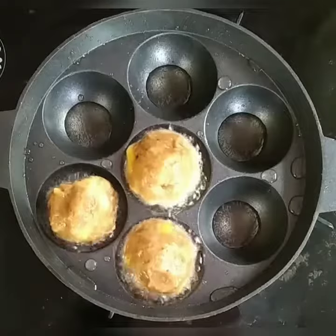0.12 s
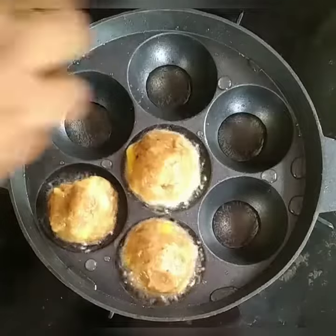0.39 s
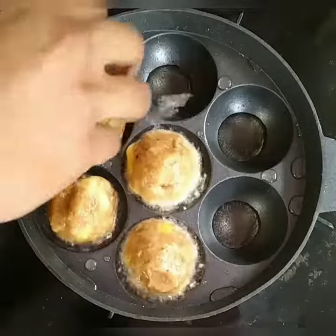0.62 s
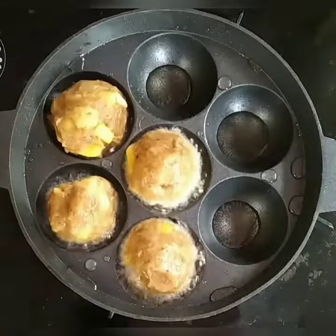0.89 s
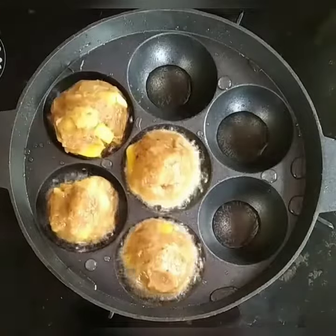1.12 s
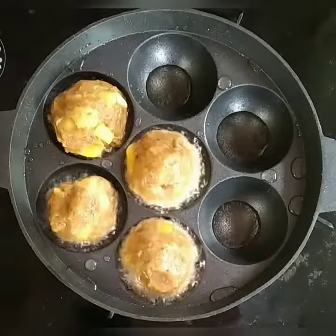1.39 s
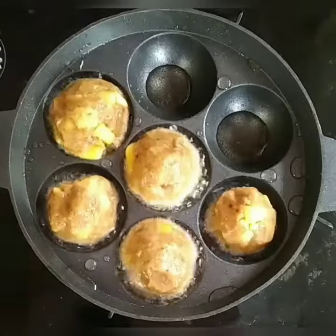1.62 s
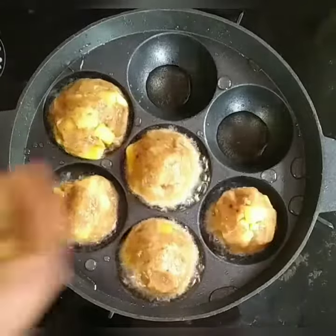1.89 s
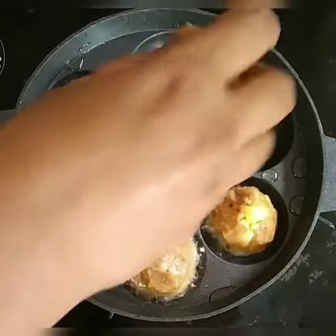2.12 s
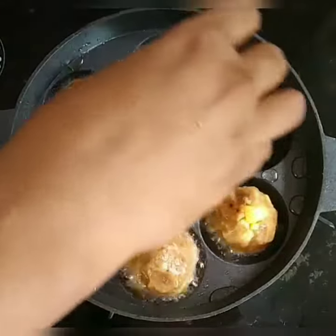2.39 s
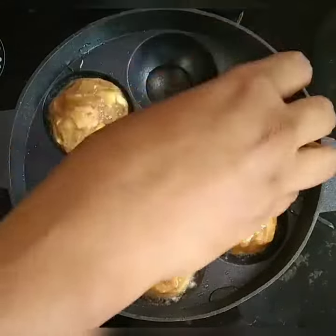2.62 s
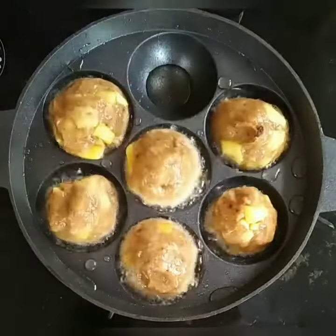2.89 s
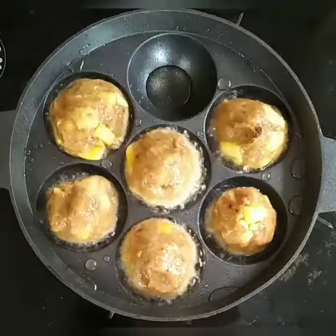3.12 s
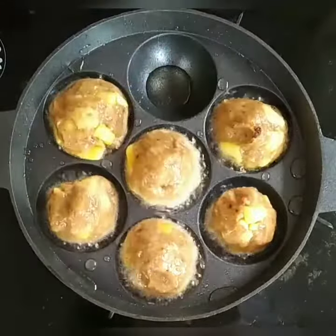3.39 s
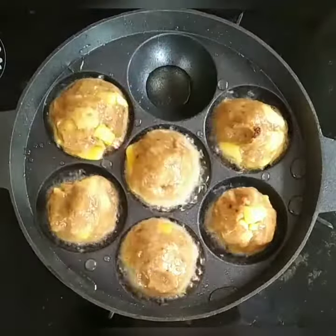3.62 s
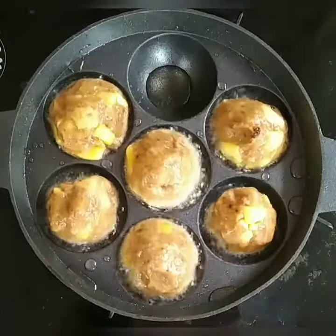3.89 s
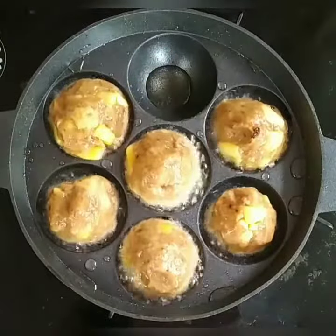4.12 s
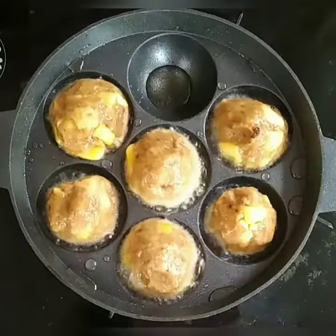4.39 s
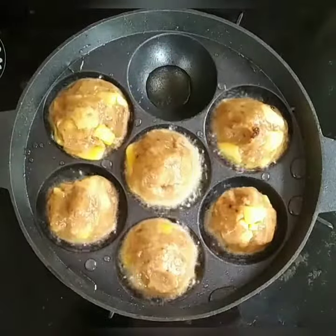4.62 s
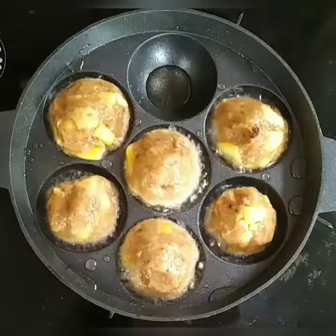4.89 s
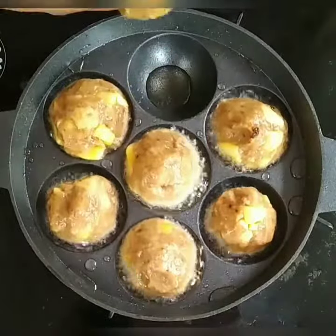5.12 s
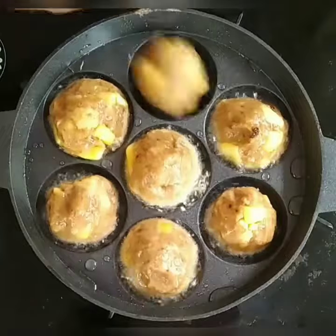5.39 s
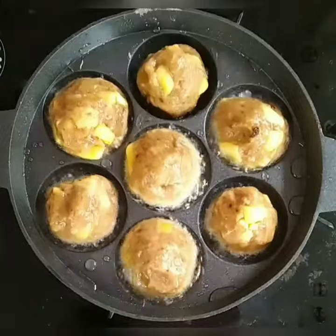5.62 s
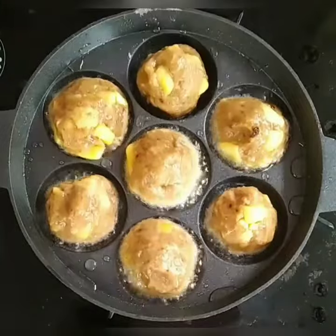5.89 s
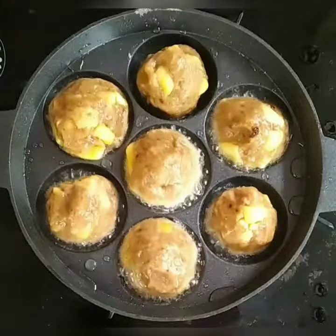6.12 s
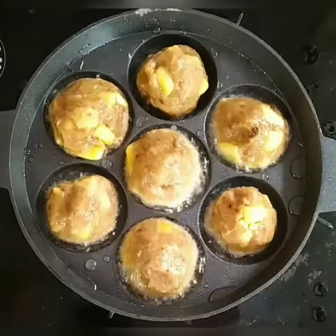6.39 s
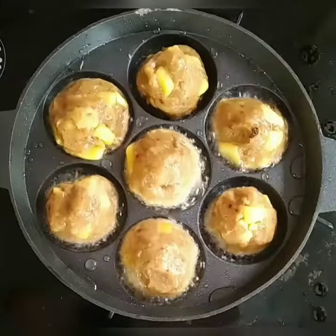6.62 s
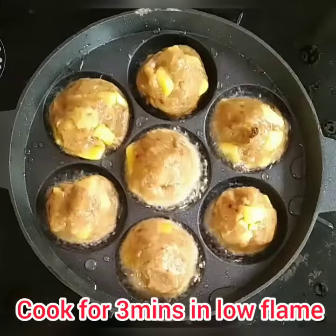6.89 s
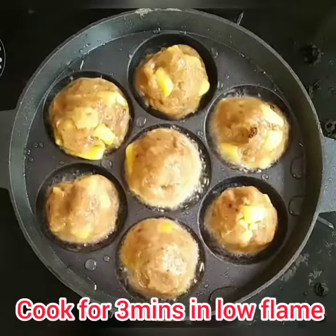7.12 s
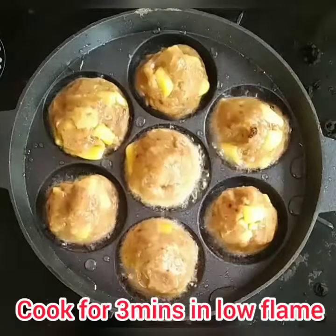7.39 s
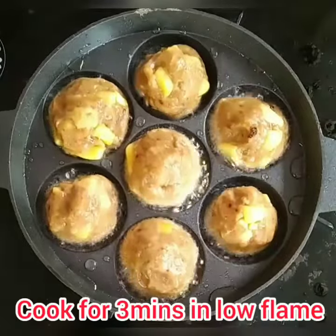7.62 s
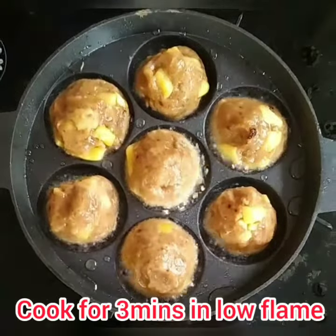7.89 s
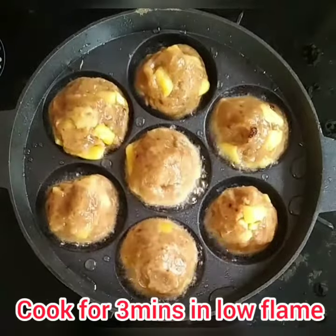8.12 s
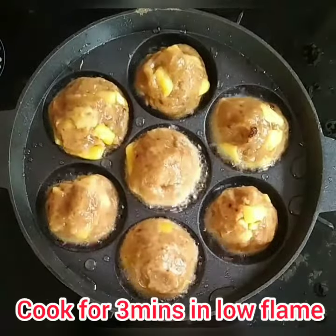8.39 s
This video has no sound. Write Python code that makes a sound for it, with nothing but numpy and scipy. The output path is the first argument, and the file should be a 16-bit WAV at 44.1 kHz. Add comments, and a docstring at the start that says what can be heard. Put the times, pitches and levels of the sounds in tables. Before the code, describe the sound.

Wet batter balls fry in hot oil, sizzling softly, then flaring into bright crackling and sharp spits before settling in a quiet kitchen.

```python
"""In a quiet kitchen, balls of batter fry in the oil-filled cups of a cast pan.
Three times a fresh ball goes in and the sizzle flares: noise plus thousands of short ringing bubbles.
Loud spits are ringing snaps with a spray behind them; a nudged steel bowl is grit shaking tuned rings.
The room hums (filtered noise), with a far knock, a horn of wavering tones and a crow of rough pulses outside.
Two spaced microphones listen from above, so many sounds reach the left side a little late."""
import sys
import numpy as np
from scipy import signal
from scipy.fft import rfft, irfft, next_fast_len
from scipy.io import wavfile

SR = 44100
rng = np.random.default_rng(int(sys.argv[2]) if len(sys.argv) > 2 else 0)


def makeup_ratio(level_db):
    """Linear amplitude ratio for a level in decibels (20 dB per factor of ten)."""
    decades = np.asarray(level_db, float) / 20
    return 10 ** decades


def pcm_store(signal):
    """Save signal as 16-bit PCM."""
    levels = np.round(np.clip(np.atleast_2d(signal), -1, 1) * 32767)
    wavfile.write(sys.argv[1], SR, levels.astype(np.int16).T)


N = 375291   # length in samples, about 8.5 s

# Colour of the tiny bubbles: pitch_hz, level_db (per Hz)
FIZZ_COLOUR = [(2240, -42), (3800, -11.5), (5910, -7), (8630, 1.5), (11700, -6.5), (13800, -6)]
# Steady frying, fuller as the cups fill: time_s, level_db
SIMMER_LEVEL = [(0, -62), (2.3, -63.5), (4.2, -58), (8.51, -59.5)]
# Wet batter meets the oil, or a pocket of its water boils up: start_s, rise_s, peak_db,
# fall_db_per_s, middling_bubbles_db, large_bubbles_db (both against the flare)
BOIL_FLARES = [(0.545, .1, -54, 7.5, -25, -22), (0.62, .15, -54, 22, -32, -28),
               (2.575, .095, -42.5, 16, -30, -25), (2.7, .11, -41.5, 89.5, -30, -20),
               (2.9, .07, -45.5, 69.5, -18, -19.5), (5.285, 0.11, -37, 130, -15, -27.5),
               (5.401, .06, -49, 8.5, -23, -25), (5.59, .1, -49.5, 35.5, -7, -27)]
# How alike left and right are: pitch_hz, likeness (1 same, 0 unrelated, -1 opposite)
SIDE_LIKENESS = [(60, 0.78), (130, 0.98), (290, 0.82), (640, 0.35), (1410, -0.037), (3100, -0.18),
                 (6820, -0.003), (15000, 0.12)]
# Hum of kitchen and street: time_s, low_hum_db, upper_hum_db
HUM_LEVELS = [(0, -72.5, -81), (0.7, -72.5, -79), (1.7, -73, -76.5), (2.5, -71, -77), (3.6, -70.5, -72),
              (4.5, -72, -77), (5.5, -69.5, -78), (6.8, -67.5, -76), (7.7, -70, -74), (8.05, -69, -73),
              (8.51, -71.5, -72)]
# Colour of that hum: pitch_hz, level_db (per Hz)
HUM_COLOUR = [(26, -29), (45, -37), (54, -3.5), (87, -7), (214, -11), (268, -24.5), (369, -17.5),
              (420, -17.5), (557, -19.5), (1040, -28), (4000, -28.5), (5200, -49), (8800, -120)]
# Deep, lumpy rumble: time_s, level_db
RUMBLE_LEVEL = [(0, -71), (0.65, -62.5), (1.05, -62.5), (1.27, -70.5), (1.4, -62), (1.66, -68.5),
                (3.3, -67), (3.79, -57), (4.05, -64.5), (4.71, -62.5), (4.93, -67.5), (5.8, -66.5),
                (6.85, -67.5), (7.04, -60.5), (7.4, -72.5), (7.75, -61.5), (8.05, -69), (8.51, -65)]
# Loud spits of oil: start_s, peak_db, pitch_hz, left_over_right_db, spray_db (against the snap)
LOUD_SPITS = [(0.345, -34, 11600, 6, -13), (0.4657, -33.5, 8700, 2, -27), (0.6875, -29, 9000, 1, -17),
              (0.983, -30, 8790, -2, -24), (1.1594, -37, 8030, 0.0, -19), (1.4282, -39, 7000, 0.0, -11),
              (2.4284, -35.5, 8800, 10, -13.5), (2.6743, -25, 8600, -4, -14), (2.7094, -24, 8740, -2, -25),
              (2.7506, -21, 8150, -0.5, -19), (2.7879, -20, 5790, -3, -15), (2.8165, -18, 8100, -8, -5),
              (2.9072, -14, 7850, -4.5, -15), (2.9302, -20, 8730, 2, -12), (3.0011, -21, 8480, -0.5, -11),
              (3.0345, -28, 9080, -3, -16), (3.103, -26, 7770, -6, -16), (3.1512, -27, 8460, -6, -16),
              (3.215, -26.5, 8540, 3, -22), (3.425, -16.5, 9000, 9, -23), (3.5889, -28, 8900, 0.0, -12),
              (3.745, -28, 8360, -2, -17), (4.1674, -31, 9150, 1.0, -14), (4.9563, -34.5, 7400, -3, -19),
              (5.3597, -21.5, 9100, 0.0, -12), (5.3803, -12, 7600, -8, -18.5), (5.4084, -12, 8600, -4, -20),
              (5.4266, -18, 9700, 5, -17), (5.4453, -19, 7310, -7, -17.5), (5.4812, -22, 9350, -9, -19),
              (5.5611, -19, 9300, -2, -14), (5.5794, -21, 10300, -1, -20), (5.6825, -19, 8930, 0.0, -18),
              (5.7274, -24, 9430, -1.0, -21), (5.748, -18.5, 9160, 0.0, -21), (5.7743, -18, 8500, 2, -20.5),
              (5.836, -30, 8500, 0.0, -8), (5.889, -25, 9600, 0.5, -11), (6.0536, -25, 9100, -2, -11),
              (6.124, -33, 8070, -11, -14), (6.2168, -18.5, 9700, -3, -17), (6.266, -30, 8390, 1.5, -14),
              (6.2843, -18, 10000, -2, -12.5), (6.547, -32, 9160, 0.0, -12), (6.8404, -35, 9000, -10, -16),
              (6.9368, -22.5, 10350, 2, -19), (7.1938, -36, 9710, 0.0, -18), (7.7258, -33, 8000, -0.5, -11)]
# Soft far knock: pitch_hz, level_db, fade_s (time to sink 60 dB)
KNOCK_RINGS = [(380, -72, .15), (770, -64.5, 0.21), (920, -69, .12)]
# Horn toots: start_s, length_s, level_db (before the levels of the tones)
HORN_TOOTS = [(3.025, 0.12, -71.5), (3.255, 0.018, -71), (3.338, 0.022, -69.5)]
# The horn's tones, lowest first: level_db (before a shared 4 dB lift)
HORN_TONES = [-4, -11, -7]
# Rings of the steel bowl: pitch_hz, half_width_hz, level_db
BOWL_RINGS = [(510, 55, -9.5), (1080, 14, -24), (2230, 170, -9.5), (3320, 32, -3.5), (4040, 45, 4),
              (5140, 120, -1), (6170, 48, 1), (6640, 44, 3), (6960, 41, 1.5), (7780, 72, 2.5),
              (8400, 48, 5), (9600, 33, -14), (9870, 17, 10.5), (11100, 42, -28)]
# Rings that the slipping base locks on to: pitch_hz, level_db
BOWL_SONG = [(470, -11), (502, -11), (1117, 2)]
# Bowl nudged on the counter: start_s, push_s, level_db, brightness_db, singing_db
BOWL_NUDGES = [(3.532, 0.0063, -46.5, -8, -5.5), (3.613, 0.0063, -50, -2, -10), (3.86, 0.035, -40, 6.5, 6)]
# Throat of the crow: pitch_hz, base_width_hz (used 5 and 7 times as wide), level_db
CROW_THROAT = [(1395, 45, -0.89), (1650, 31, -0.11)]

SIMMER_MIDDLING_DB, SIMMER_LARGE_DB = -13, -18.5   # larger bubbles against the simmer
SIMMER_CRACKLE, FLARE_CRACKLE, CRACKLE_WANDER = 0.16, 0.28, 0.14   # share of separate crackle, 0 to 1
SIMMER_WAVER_DB, FLARE_WAVER_DB, WAVER_HZ = 0.8, 2, 20   # the boil never holds still
RISE_POWER = 3.7   # a flare gathers slowly, then leaps
SMALL_SPIT_COUNT, SMALL_SPIT_HZ = 18, 8700
SMALL_SPIT_DB, SMALL_SPRAY_DB = 16.5, -10.5   # peak above the sizzle; spray against the snap
KITCHEN_T60_S, WALL_CUT_HZ = 0.15, 7400


def rms_one(x):
    """Scales to rms 1 for the mean of the channels."""
    return x / np.sqrt(np.mean(np.atleast_2d(x).mean(axis=0) ** 2) + 1e-20)


def in_time(rows):
    """Draws straight lines through the columns of a table over time."""
    s, *columns = np.transpose(rows)
    return [np.interp(np.arange(N) / SR, s, column) for column in columns]


def at_hz(points, hz):
    """Reads a table at a pitch, in straight lines over log pitch."""
    table_hz, value = np.transpose(points)
    return np.interp(np.log(hz), np.log(table_hz), value)


def drift(rate_hz):
    """Slow chance: noise at every 40th sample through a double one-pole low-pass; spread 1."""
    r = np.exp(-80 * np.pi * rate_hz / SR)
    noise = rng.standard_normal(N // 40 + 2002)
    slow = signal.lfilter([1], [1, -2 * r, r * r], noise)[2000:]   # skip the filter's start
    return np.interp(np.arange(N) / 40, np.arange(len(slow)), rms_one(slow))


def swell(s, hold_s, rise_db_per_s, fall_db_per_s):
    """Level in dB under the top: climbs until s, holds, then sinks."""
    t = np.arange(N) / SR
    climb = rise_db_per_s * np.maximum(s - t, 0)
    sink = fall_db_per_s * np.maximum(t - s - hold_s, 0)
    return np.maximum(-climb - sink, -200)


def resonance(x, hz, width_hz):
    """Something that rings at one pitch: two poles, gain 1 on top."""
    r = np.exp(-np.pi * width_hz / SR)
    poles = [1, -2 * r * np.cos(2 * np.pi * hz / SR), r * r]
    return signal.lfilter([(1 - r * r) / 2, 0, (r * r - 1) / 2], poles, x + 1e-18)


def band(x, low_hz, high_hz):
    """Keeps the sound between two pitches."""
    sos = signal.butter(2, [low_hz, min(high_hz, 0.45 * SR)], "band", fs=SR, output="sos")
    return signal.sosfilt(sos, x)


def no_lows(x, edge_hz):
    """Small bubbles give next to nothing under their edge."""
    return signal.sosfilt(signal.butter(6, edge_hz, "high", fs=SR, output="sos"), x)


def banded_noise(colour, edges, patchy_db, rate_hz):
    """Bands of stereo noise, each with its own level, flicker and likeness of the sides."""
    out, together = 0, drift(rate_hz / 4)
    white = rng.standard_normal((2, 2, N))
    for k, (low, high) in enumerate(zip(edges, edges[1:])):
        mid, side = band(white[k % 2], low, high)
        hz = np.sqrt(low * high)
        alike = np.clip(at_hz(SIDE_LIKENESS, hz), -1, 1)
        gain = makeup_ratio(at_hz(colour, hz) + patchy_db * (together + drift(rate_hz)))
        stereo = np.sqrt(1 + alike) * mid + np.sqrt(1 - alike) * side * [[1], [-1]]
        out = out + gain * stereo
    return rms_one(out)


def boil():
    """Gains of fine, middling and large bubbles and the crackle share: simmer and flares add in power."""
    t = np.arange(N) / SR
    simmer = makeup_ratio(2 * in_time(SIMMER_LEVEL)[0])   # doubled dB gives power
    middling = simmer * makeup_ratio(2 * SIMMER_MIDDLING_DB)
    large = simmer * makeup_ratio(2 * SIMMER_LARGE_DB)
    flare = np.zeros(N)
    for s, rise_s, peak_db, fall, middling_db, large_db in BOIL_FLARES:
        rise = np.clip((t - s) / rise_s, 0, 1) ** RISE_POWER
        one = rise * makeup_ratio(2 * (peak_db - fall * np.maximum(t - s - rise_s, 0)))
        flare += one
        middling += one * makeup_ratio(2 * middling_db)
        large += one * makeup_ratio(2 * large_db)
    waver = drift(WAVER_HZ)
    fine = simmer * makeup_ratio(2 * SIMMER_WAVER_DB * waver) + flare * makeup_ratio(2 * FLARE_WAVER_DB * waver)
    share = (SIMMER_CRACKLE * simmer + FLARE_CRACKLE * flare) / (simmer + flare)
    share = np.clip(share + CRACKLE_WANDER * drift(9.5), 0, 1)
    return np.sqrt(fine), np.sqrt(middling), np.sqrt(large), share


def bursts(per_s, spread_db, pitches, gains, cycles):
    """Bubbles burst at random moments; each rings a few cycles and reaches the left a little late."""
    at = np.flatnonzero(rng.random(N - 40) < per_s[:N - 40] / SR)
    size = makeup_ratio(spread_db * np.minimum(rng.exponential(1, len(at)), 5))
    size = size * rng.choice([-1, 1], len(at))
    late = rng.integers(3, 14, len(at))   # samples
    dealt = rng.integers(0, len(pitches), len(at))   # which pitch each bubble gets
    lean = makeup_ratio(rng.normal(0, 3.5, len(at)))   # louder left or right
    out = np.zeros((2, N))
    for k, (hz, gain) in enumerate(zip(pitches, gains)):
        mine, clicks = dealt == k, np.zeros((2, N))
        np.add.at(clicks[0], (at + late)[mine], (size * lean)[mine])
        clicks[1, at[mine]] = (size / lean)[mine]
        out += gain * resonance(clicks, hz, hz / cycles) * np.sqrt(cycles)
    return rms_one(out)


def sizzle(fine_gain, middling_gain, large_gain, share):
    """A dense hiss of tiny bubbles, clumped crackle on top, larger bubbles fizzing lower down."""
    clumps = makeup_ratio(4.0 * drift(40))   # bursts set each other off
    pitches = np.geomspace(3800, 14000, 12)
    crackle = bursts(2500 * clumps, 4.0, pitches, makeup_ratio(at_hz(FIZZ_COLOUR, pitches)), cycles=4.5)
    hiss = banded_noise(FIZZ_COLOUR, np.geomspace(3600, 15000, 10), patchy_db=0.5, rate_hz=30)
    fine = np.sqrt(share) * crackle + np.sqrt(1 - share) * hiss
    middling = bursts(3000 * clumps, 1.62, np.geomspace(3000, 5200, 5), np.ones(5), cycles=10.2)
    large_hz = np.geomspace(700, 2200, 6)
    large_gains = makeup_ratio(-1.5 * np.log2(2400 / large_hz))   # 1.5 dB weaker per octave down
    large = bursts(1200 * clumps, 2.9, large_hz, large_gains, cycles=7.0)
    out = fine_gain * no_lows(fine, edge_hz=3470)
    out += middling_gain * no_lows(middling, edge_hz=2600)
    return out + large_gain * large


def air():
    """The steady hum of kitchen and street, as noise in bands, over a deep, lumpy rumble."""
    low_db, upper_db = in_time(HUM_LEVELS)
    deep_db = in_time(RUMBLE_LEVEL)[0]
    low = banded_noise(HUM_COLOUR, np.geomspace(45, 250, 6), patchy_db=1.0, rate_hz=2.4)
    upper = banded_noise(HUM_COLOUR, np.geomspace(250, 900, 5), patchy_db=1.0, rate_hz=7.4)
    thin = banded_noise(HUM_COLOUR, np.geomspace(900, 4500, 5), patchy_db=0.3, rate_hz=6.9)
    apart = band(rng.standard_normal((2, N)) * [[1], [0.9]], 20, 34)
    shared = 6 * band(rng.standard_normal(N), 11.5, 31.5)
    deep = rms_one(apart + shared)
    return makeup_ratio(low_db) * low + makeup_ratio(upper_db) * upper + makeup_ratio(-73) * thin + makeup_ratio(deep_db) * deep


def kitchen(x):
    """Room echo: five feedback delays a side, duller each round, worked out frequency by frequency."""
    size = next_fast_len(N + SR // 2)
    w = 2 * np.pi * np.arange(size // 2 + 1) / size
    dull = 1 / np.sqrt(1 + (w * SR / (2 * np.pi * WALL_CUT_HZ)) ** 2)
    walls = np.zeros((2, len(w)), complex)
    for k, lag_s in enumerate(rng.uniform(0.0088, 0.03, 10)):
        once = makeup_ratio(-60 * lag_s / KITCHEN_T60_S) * dull * np.exp(-1j * w * round(lag_s * SR))
        walls[k % 2] += once / (1 - once) * (-1) ** (k // 2)   # endless rounds summed
    return irfft(walls * rfft(x, size), size)[:, :N]


def spits(rows):
    """Oil spits: one sharp ringing snap, then a short spray of smaller snaps as the droplets land."""
    out, size = np.zeros((2, N + 4000)), 2600
    t = np.arange(size) / SR
    for s, peak_db, hz, pan_db, spray_db in rows:
        droplets = (rng.random(size) < 600 / SR) * rng.normal(0, 4, size)
        spray = droplets + rng.standard_normal((2, size)) * 0.3
        spray = makeup_ratio(spray_db) * spray * np.exp(-t / 0.0078)
        spray[:, 0] = 1   # the snap itself
        snap = resonance(spray, hz, hz / 4.0) + 0.22 * band(spray, 3600, 15000)
        side_db = peak_db + np.array([[pan_db / 2], [-pan_db / 2]])
        snap = snap / np.abs(snap[:, :40]).max() * makeup_ratio(side_db)
        at = round(s * SR)
        late = round(rng.integers(1, 3) * SR / hz)   # the left hears it a cycle or two late
        out[0, at + late:at + late + size] += snap[0]
        out[1, at:at + size] += snap[1]
    return no_lows(out[:, :N], edge_hz=2930)


def small_spits(fine_gain):
    """Rows of lesser spits at random, more often and louder where the boil is strong."""
    odds = np.cumsum(fine_gain ** 0.8)
    at = np.searchsorted(odds, rng.random(SMALL_SPIT_COUNT) * odds[-1])
    level, pitch, pan = rng.standard_normal((3, SMALL_SPIT_COUNT))
    peak_db = 20 * np.log10(fine_gain[at]) + SMALL_SPIT_DB + 2.5 * level
    hz = SMALL_SPIT_HZ * (1 + 0.08 * pitch)
    return [(*row, SMALL_SPRAY_DB) for row in zip(at / SR, peak_db, hz, 2.6 * pan)]


def knock():
    """A soft far knock: a few pure tones that die away."""
    t = np.maximum(np.arange(N) / SR - 1.43, 0)   # starts at 1.43 s
    return sum(makeup_ratio(db - 60 * t / t60) * np.sin(2 * np.pi * hz * t) for hz, db, t60 in KNOCK_RINGS)


def horn():
    """A far horn: a tone and its overtones whose pitch wavers together, let through in short toots."""
    turn = 2 * np.pi * np.cumsum(460 * (1 + 0.0257 * drift(17))) / SR   # around 460 Hz
    tones = sum(makeup_ratio(db + 4) * np.sin((k + 1) * turn) for k, db in enumerate(HORN_TONES))
    toots = sum(makeup_ratio(db + swell(s, length_s, 402, 402)) for s, length_s, db in HORN_TOOTS)
    return toots * tones


def bowl():
    """Dense grit under the dragged base shakes the steel, by turns duller, brighter or singing."""
    out = np.zeros((2, N))
    for s, push_s, level_db, bright_db, song_db in BOWL_NUDGES:
        a, b = round(s * SR) - 5000, round(s * SR) + 8000   # the rings are run in before the drag
        grit = rng.standard_normal((3, b - a)) * (rng.random(b - a) < 6000 / SR)
        near = grit[0] + 0.5 * grit[1:]   # low rings reach both sides much alike
        apart = grit[0] + 14.0 * grit[1:]
        low, high = 0.22 * band(near, 350, 5200), 0.25 * band(apart, 4800, 11500)
        for hz, half_width, db in BOWL_RINGS:
            if hz < 3500:
                low += makeup_ratio(db) * resonance(near, hz, 2 * half_width)
            else:
                high += makeup_ratio(db) * resonance(apart, hz, 2 * half_width)
        t = np.arange(b - a) / SR - [[0.00025], [0]]   # left a quarter millisecond late
        song = sum(makeup_ratio(db) * np.sin(2 * np.pi * (hz * t + rng.random())) for hz, db in BOWL_SONG)
        push = makeup_ratio(level_db + swell(s, push_s, 2500, 393)[a:b])
        sings = makeup_ratio(song_db + swell(s + push_s, 0.0031, 110, 500)[a:b])   # peaks as the push ends
        out[:, a:b] += push * (rms_one(low) + makeup_ratio(bright_db) * rms_one(high) + sings * song)
    return out * makeup_ratio([[-1.5], [1.5]])


def caw():
    """A crow's hoarse caw: uneven pulses and a little breath noise through two throat resonances."""
    pulse_count = np.cumsum(120 * (1 + 0.17 * drift(80))) / SR   # around 120 pulses a second
    beats = np.diff(np.floor(pulse_count), prepend=0)
    hoarse = beats * rng.normal(1, 0.36, N) + 0.019 * rng.standard_normal(N)
    voice = sum(makeup_ratio(db) * resonance(resonance(hoarse, hz, 5 * width), hz, 7 * width)
                for hz, width, db in CROW_THROAT)
    level_db = -64.5 + swell(6.765, 0.16, rise_db_per_s=400, fall_db_per_s=1200)
    return makeup_ratio(level_db) * rms_one(voice)


def scene():
    """Pan and bowl close by, far sounds outside, all echoed softly by the kitchen, over the hum."""
    gains = boil()
    near = sizzle(*gains) + spits(LOUD_SPITS + small_spits(gains[0])) + bowl()
    far = knock() + horn() + caw()
    echo = makeup_ratio(-9) * kitchen(near[1] + 1.6 * far)   # fed from the right side of the near sounds
    return near + far + echo + air()


def roll_off(x):
    """The treble ends steeply here."""
    return signal.sosfilt(signal.butter(12, 15610, fs=SR, output="sos"), x)


def record(dry):
    """Cuts the top steeply: 60 dB down from 14720 Hz upward."""
    steep = signal.cheby2(16, 60, 14720, fs=SR, output="sos")
    mix = signal.sosfilt(steep, dry)
    return roll_off(mix)


dry = scene()
out = record(dry)
pcm_store(out)
```